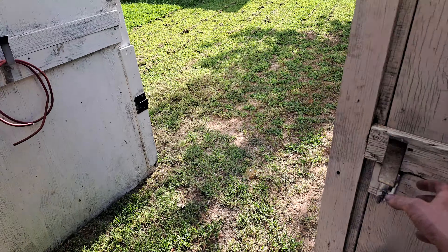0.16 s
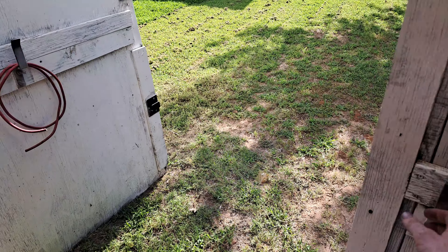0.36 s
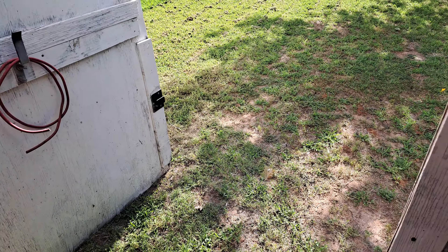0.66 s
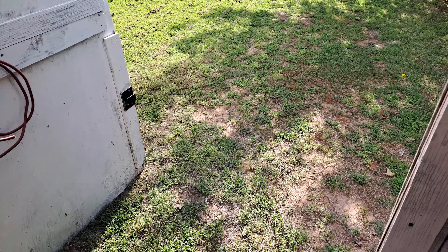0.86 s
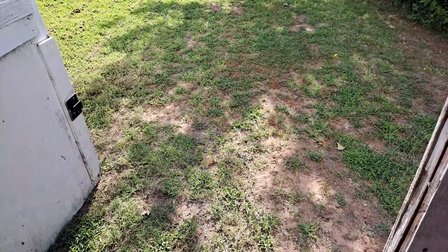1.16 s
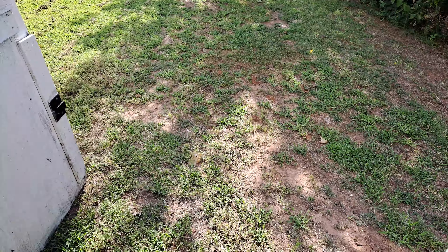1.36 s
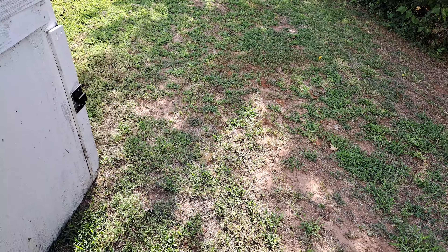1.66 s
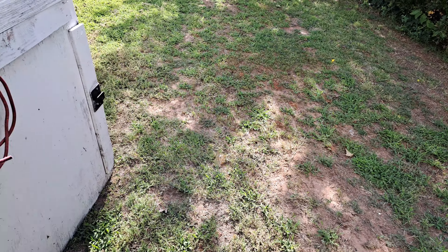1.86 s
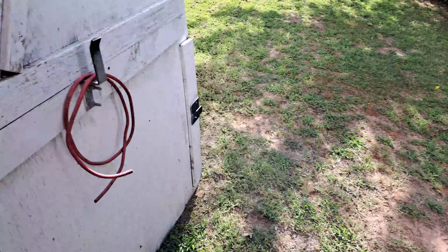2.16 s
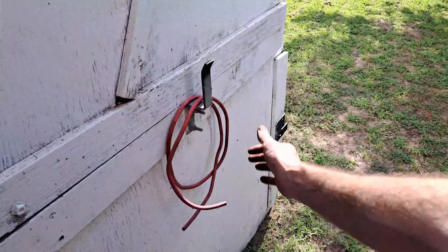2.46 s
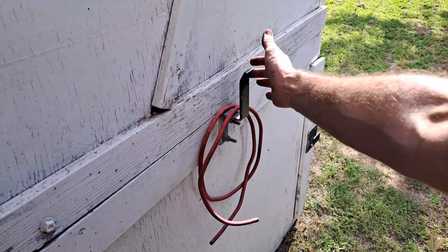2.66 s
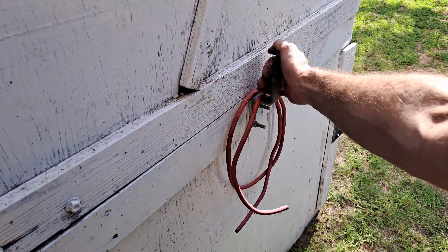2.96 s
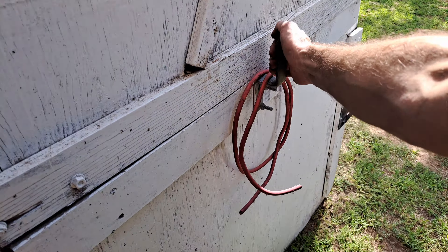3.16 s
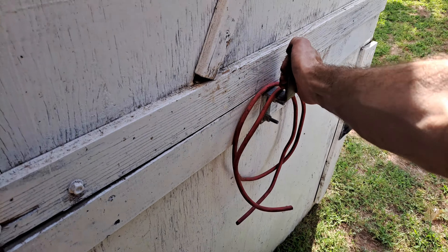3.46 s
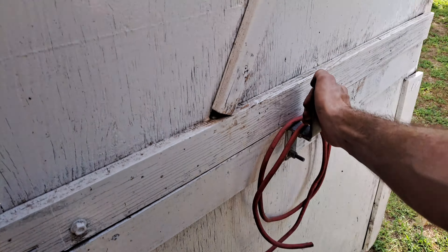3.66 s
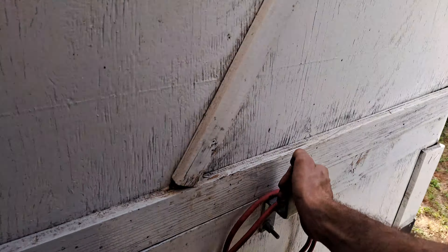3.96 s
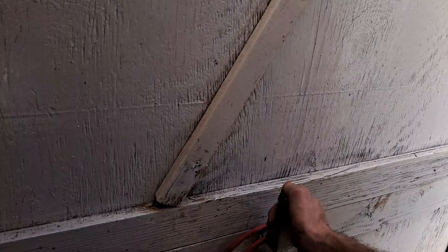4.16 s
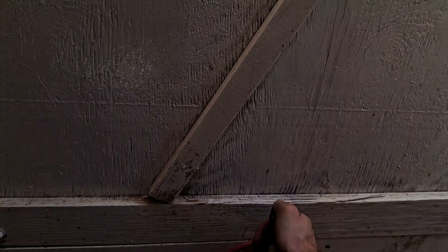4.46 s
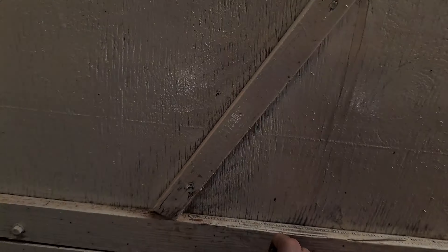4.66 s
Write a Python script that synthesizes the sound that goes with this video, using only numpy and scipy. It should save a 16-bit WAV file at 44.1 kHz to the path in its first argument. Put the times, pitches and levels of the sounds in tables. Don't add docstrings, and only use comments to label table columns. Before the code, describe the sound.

Close by, a plank door brushes over grass and grit with small clicks and light wooden knocks, then slams hard at about one and a half seconds, its loose steel latch rattling. A quiet yard with faint bird chips follows. The second door scrapes loudly over stones, judders and booms shut. Stereo microphone held at the doorway, short wooden shed reverberation.

```python
import sys
import numpy as np
from scipy import signal
from scipy.fft import rfft, irfft, next_fast_len
from scipy.io import wavfile
from scipy.ndimage import uniform_filter1d

SR = 44100
rng = np.random.default_rng(int(sys.argv[2]) if len(sys.argv) > 2 else 0)


def decibels_to_gain(level_db):
    exponent = np.asarray(level_db, float) / 20
    return 10 ** exponent


def inscribe(sig):
    pcm = np.round(np.clip(np.atleast_2d(sig).T, -1, 1) * 32767)
    wavfile.write(sys.argv[1], SR, pcm.astype(np.int16))


N = 211676
HALF_SECOND = np.arange(SR // 2) / SR


def unit(x):
    return x / np.sqrt(np.mean(x ** 2))


def colour(x, table):
    hz, db = np.transpose(table)
    size = next_fast_len(x.shape[-1])
    f = np.maximum(np.fft.rfftfreq(size, 1 / SR), 1)
    gain = decibels_to_gain(np.interp(np.log(f), np.log(hz), db))
    return irfft(rfft(x, size) * gain, size)[..., :x.shape[-1]]


def ring(x, hz, t60):
    pole = np.exp(2j * np.pi * hz / SR - np.log(1000) / (t60 * SR))
    return signal.lfilter([1], [1, -pole], x).imag


def band(x, hz, width_hz):
    return signal.lfilter(*signal.iirpeak(min(hz, .45 * SR), hz / width_hz, fs=SR), x)


def band_twice(x, hz, width_hz):
    return band(band(x, hz, width_hz), hz, width_hz)


def decay(t, t60):
    return np.exp(-np.log(1000) * t / t60)


def pan(db):
    return decibels_to_gain(np.array([db, -db]) / 2)


def walk(rate):
    k = int(SR / rate)
    held = np.repeat(rng.standard_normal(N // k + 1), k)
    return 1.3 * uniform_filter1d(uniform_filter1d(held, k), k)[:N]


# (frequency [Hz], side minus mid [dB])
PORT_SPREAD = [(60, -8), (110, -21), (200, -15.5), (380, -13.5), (700, -1), (1290, 1), (2380, -0.5),
               (4400, 1.5), (8120, 0.5), (15000, -0.5)]


def wide(envelope=1.):
    mid, side = envelope * rng.standard_normal((2, N))
    side = colour(side, PORT_SPREAD)
    return np.array([mid + side, mid - side])


def grains(rate, spread_db, tail_s):
    hit = rng.random(N) < rate / SR
    size = decibels_to_gain(spread_db * np.minimum(rng.exponential(size=N), 5.))
    power = signal.lfilter([1], [1, -np.exp(-1 / (tail_s * SR))], (hit * size) ** 2)
    return unit(np.sqrt(power + 1e-9))


def curve(table):
    s, *columns = np.transpose(table)
    return [np.interp(np.arange(N) / SR, s, c) for c in columns]


def add(out, s, sound):
    i = int(s * SR)
    out[:, i:i + sound.shape[1]] += sound[:, :N - i]


def draught(hz, width_hz, steady):
    wave = band(band(rng.standard_normal(N), hz, width_hz), hz, 2 * width_hz)
    wave = signal.hilbert(wave, next_fast_len(N))[:N]
    return unit(wave.real / (np.abs(wave) + 1e-9) ** steady)


# (time [s], level [dB])
DRAUGHT = [(0.0, -54), (0.09, -41), (0.22, -46), (0.59, -39.5), (0.67, -71), (0.86, -35), (1.1, -39),
           (1.16, -40.5), (1.45, -40.5), (1.54, -29), (1.72, -41.5), (2.45, -51), (2.85, -38.5),
           (2.93, -40), (3.15, -37), (3.4, -42), (4.03, -39.5), (4.75, -46)]
# (frequency [Hz], width [Hz], level [dB])
AIR_MODES = [(54.05, 5.7, -4.5), (120.7, 19, -10.5)]
# (time [s], level [dB], swell [s], t60 [s])
THUDS = [
    (1.527, -19.5, 0.014, 0.2),
    (3.139, -24, 0.0073, 0.065),
    (4.518, -15, 0.052, 0.35),
]


def shed_air():
    hum = sum(decibels_to_gain(db) * draught(hz, w, steady=0.32) for hz, w, db in AIR_MODES)
    out = np.tile(unit(hum) * decibels_to_gain(curve(DRAUGHT)[0] + 0.4), (2, 1))
    t = HALF_SECOND
    boom_hz = 54.9
    for s, db, swell, t60 in THUDS:
        shape = np.minimum(t / swell, 1) ** 2 * decay(np.maximum(t - swell, 0), t60)
        add(out, s, np.tile(decibels_to_gain(db) * shape * np.sin(2 * np.pi * boom_hz * t), (2, 1)))
    return out


# (frequency [Hz], level [dB per Hz])
YARD = [(15, -37), (25, -7), (60, 5), (97, -6.5), (321, -6), (410, -13.5), (496, -30), (553, -19.5),
        (901, -26), (1390, -33), (1510, -29), (1830, -30), (7910, -48.5), (10000, -53.5), (15200, -68),
        (16500, -76)]


def yard():
    return unit(colour(wide(decibels_to_gain(1.2 * walk(6.23))), YARD)) * decibels_to_gain(-42)


def strokes(table):
    s, swell, fade, db = np.transpose(table)[:4, :, None]
    late = np.arange(N) / SR - s
    part = np.where(late < 0, -late / swell, late / fade)
    drop_db, bend = 24.5, 1.175
    return decibels_to_gain(2 * (db - drop_db * part ** bend)) + 1e-12


# (hardest at [s], swell [s], fade [s], level [dB], stone pitch [Hz])
SCRAPES = [(.068, 0.36, 0.22, -48.5, 3200), (.4, 1, 1, -57, 2330), (.748, 0.056, 0.2, -49, 1290),
           (.98, 0.043, 0.16, -46.5, 2710), (1.224, 0.28, 0.15, -48, 3460), (1.46, 0.9, .3, -53.5, 3320),
           (1.58, 0.11, 0.14, -39, 2500), (2.3, 0.4, 3.8, -64, 1900), (2.57, 0.52, 0.062, -57.5, 2580),
           (3.14, 0.11, 0.55, -48.5, 2500), (3.286, 0.18, 0.11, -34.5, 5000),
           (3.349, 0.055, 0.012, -39.5, 2030), (3.55, 0.14, 0.3, -38.5, 3660),
           (3.671, 0.19, 0.09, -29, 2870), (3.931, 0.19, 0.78, -43.5, 2820),
           (4.12, 0.12, 0.16, -35.5, 3400), (4.184, 0.43, 0.044, -34.5, 2920), (4.4, 0.33, 0.28, -40, 2870),
           (4.579, 0.22, 0.17, -30, 2900), (4.8, 0.14, .2, -36, 2510)]
# (hardest at [s], swell [s], fade [s], level [dB])
SWEEPS = [(.05, 0.57, 0.29, -50.5), (.35, 1, 0.5, -51), (.66, 1, .05, -56.5), (.9, 0.027, .3, -62),
          (.98, 0.045, 1, -48.5), (1.22, 0.55, 0.067, -46), (1.52, 0.76, 0.22, -52.5),
          (2.17, 0.2, 0.9, -59.5), (2.57, 0.18, 0.071, -64), (3.29, 0.36, 0.26, -54.5),
          (3.54, 0.15, 0.47, -40.5), (4.06, 0.25, 0.41, -43), (4.4, 0.081, .4, -43.5),
          (4.58, 0.49, 0.16, -37.5), (4.8, 0.2, .2, -43.5)]
# (time [s], left minus right [dB])
DOOR_SIDE = [(0, 0), (3.0, 2), (3.4, -1.5), (4.0, 2.5), (4.8, 2)]
# (frequency [Hz], level [dB per Hz])
GRIT = [(410, -17), (700, -2), (832, -14.5), (1520, 0.5), (1660, -8.5), (1840, 0.5), (2170, -4),
        (2380, -3.5), (3360, -3), (6330, -11.5), (11000, -20), (14300, -10), (22000, -120)]
GRASS = [(4710, -4), (8000, -5.5), (9680, -12), (10900, -9), (12500, -3), (15200, -10.5), (16200, -16),
         (16500, -40)]
BOARD = [(47, -18), (80, 2.5), (190, -0.5), (226, -5), (299, -2.5), (434, -4), (646, -9), (751, -11.5),
         (815, -11), (1020, -15.5), (1300, -17), (1690, -28.5), (2860, -120)]
# (frequency [Hz], width [Hz], level [dB])
BRACE = [(1350, 110, -1.5), (1770, 56, -11), (2350, 150, 7.5), (3200, 48, -25), (4200, 270, 1),
         (5000, 68, -11)]


def drag():
    pulls = strokes(SCRAPES)
    pull_power = pulls.sum(axis=0)
    grit_db = 10 * np.log10(pull_power)
    grass_db = 10 * np.log10(strokes(SWEEPS).sum(axis=0))
    centre_hz = np.transpose(SCRAPES)[-1] @ pulls / pull_power
    catch = wide(grains(rate=1000.0, spread_db=1.5, tail_s=0.0036))
    brace = sum(decibels_to_gain(db + 3.0 * walk(43.0)) * band(catch, hz, 2.74 * w) for hz, w, db in BRACE)
    coloured, grit = colour(catch, GRIT), 0
    for hz in 700 * 2 ** (np.arange(14) / 3):
        octaves = np.log2(hz / centre_hz)
        lift_db = 4.0 * np.exp(-(octaves / 0.79) ** 2) + 1.9 * walk(29.97)
        lift_db = lift_db - 6 * np.maximum(octaves, 0)
        grit = grit + decibels_to_gain(lift_db) * band_twice(coloured, hz, 0.79 * hz)
    grit = unit(grit) + decibels_to_gain(-6.5) * unit(brace)
    grass = unit(colour(1.4 * catch + wide(decibels_to_gain(2.04 * walk(26.17))), GRASS))
    board = unit(colour(wide(grains(rate=510.0, spread_db=1.0, tail_s=0.0054)), BOARD))
    board_gain = np.hypot(decibels_to_gain(-18 + 0.4645 * grit_db), decibels_to_gain(-51.5))
    foot = decibels_to_gain(grit_db - 1.5) * grit + decibels_to_gain(grass_db + 1.54) * grass
    return pan(curve(DOOR_SIDE)[0]) * foot + board_gain * board


# (time [s], length [s], frequency [Hz],
# width [Hz], rms level [dB])
RUBS = [(.684, 0.024, 460, 50, -37), (0.746, .009, 1290, 300, -42.5), (0.767, 0.0089, 2180, 300, -56),
        (0.782, 0.0076, 1500, 400, -51), (1.47, .006, 4000, 1200, -44), (1.476, .006, 3800, 900, -31),
        (1.562, 0.014, 3700, 400, -36), (1.604, 0.013, 1900, 600, -39), (2.148, 0.0096, 1530, 500, -50),
        (2.659, 0.64, 780, 237, -55), (3.1325, .016, 800, 30, -27), (3.154, 0.0089, 815, 80, -41),
        (3.235, 0.015, 740, 120, -39.5), (3.283, 0.016, 730, 120, -45), (3.485, 0.0068, 2000, 900, -44),
        (3.511, 0.15, 3400, 700, -37.5), (3.735, .016, 2420, 150, -37), (3.867, 0.0066, 1660, 900, -49),
        (3.916, 0.11, 3100, 500, -45), (3.94, .008, 1960, 1200, -39), (3.997, 0.011, 2390, 1200, -43),
        (4.062, 0.013, 1530, 200, -31.5), (4.078, 0.063, 4080, 500, -38), (4.152, .055, 2530, 250, -46),
        (4.253, 0.013, 4060, 883, -44), (4.288, 0.018, 2400, 300, -35.5), (4.355, 0.013, 2590, 900, -42),
        (4.535, 0.061, 1810, 180, -37.5), (4.577, .04, 2870, 400, -41), (4.671, 0.048, 1240, 250, -44),
        (4.73, .008, 1240, 300, -35), (4.728, 0.0081, 3960, 500, -34.5), (4.76, 0.0068, 1230, 300, -30),
        (4.79, 0.013, 2060, 250, -33), (4.79, .008, 1200, 400, -34),
        (.03, .05, 2800, 900, -46), (.684, .006, 5500, 1500, -52), (.952, .008, 2330, 150, -46),
        (.969, .01, 2340, 150, -38), (1.482, .012, 800, 250, -20), (1.495, .05, 1020, 60, -28),
        (1.495, .06, 550, 60, -26), (1.49, .08, 231, 30, -27), (1.525, .006, 6300, 900, -26),
        (1.525, .006, 2400, 700, -25), (2.004, .008, 900, 500, -50), (3.14, .025, 200, 60, -35),
        (3.2, .07, 200, 70, -37), (3.265, .05, 6000, 1600, -39), (3.346, .009, 1800, 400, -34),
        (3.346, .008, 3200, 1500, -35), (3.517, .01, 2550, 200, -35), (3.543, .009, 4000, 400, -33),
        (3.575, .007, 3500, 900, -29), (3.626, .008, 3300, 600, -26), (3.651, .011, 3000, 1500, -25),
        (3.63, .07, 500, 200, -36), (3.67, .04, 3200, 250, -35), (4.02, .04, 3200, 1200, -40),
        (.742, .045, 2000, 1100, -43), (2.034, .008, 3500, 3000, -56), (2.365, .008, 6000, 6000, -56),
        (2.47, .04, 6000, 5000, -56), (2.566, .007, 9500, 6000, -55), (2.58, .007, 9000, 6000, -57),
        (2.682, .009, 7500, 1500, -56), (3.279, .009, 6300, 900, -33), (1.553, .075, 6370, 40, -41),
        (1.583, .03, 4680, 50, -43), (1.625, .05, 3430, 40, -42), (1.625, .035, 4620, 50, -44)]


def rubs():
    out = np.zeros((2, N))
    rise = .3
    unlike, steady, settle = .35, .7, 4096
    for s, length, hz, width_hz, db in RUBS:
        feed = rng.standard_normal((3, SR // 2 + settle))
        feed = feed[0] + unlike * feed[1:]
        wave = signal.hilbert(band(band(feed, hz, width_hz), hz, 2 * width_hz))[:, settle:]
        wave = unit(wave.real / (np.abs(wave) + 1e-9) ** steady)
        part = HALF_SECOND / length
        shape = np.sin(np.pi / 2 * np.clip(np.minimum(part / rise, (1 - part) / (1 - rise)), 0, 1))
        add(out, s, decibels_to_gain(db) * shape * wave)
    return out


# (time [s], peak [dB], bright edge [dB], left minus right [dB])
SNAPS = [(0.0813, -24, -5, 0), (0.278, -39.5, 8.5, -2), (0.325, -43, 14, 1), (0.483, -42, 17, -1),
         (.637, -47, 12, -2), (.6838, -49, 12, -4), (1.17, -30.5, -3, -4), (1.8057, -49.5, 2, -1),
         (2.21, -42, -1, -3), (2.5444, -40.5, -12, 7), (2.6846, -56, 4, 4), (3.042, -42, -5, 3)]
# (time [s], peak [dB], centre [Hz], t60 [s], bright edge [dB])
CLACKS = [
    (1.477, -11.5, 1900, 0.071, -13.5),
    (1.5252, -7.5, 2930, 0.027, -22),
    (1.552, -15.5, 2090, 0.13, -22),
    (1.6052, -28, 2270, 0.031, -38),
    (1.6347, -31, 2060, 0.033, -8),
    (2.4773, -41, 2020, 0.13, -29),
]
# (time [s], peak [dB], centre [Hz], left minus right [dB])
HINGE = [(0.7435, -44, 2130, 4), (0.761, -47, 2040, -2), (0.78, -48, 1790, -6), (0.9713, -42, 2230, 0),
         (1.009, -26.5, 2760, 4), (1.2402, -33, 2180, 2), (1.379, -33, 2060, 1), (1.43, -33.5, 5010, -8),
         (2.568, -44, 1540, 6), (2.585, -44, 1770, -8), (3.0334, -38, 2220, -8)]
STONES = [(3.1058, -33.5, 2190, 1.5), (3.1262, -27, 1900, 2), (3.167, -43, 2750, 4), (3.194, -28, 3680, -6),
          (3.2814, -18.5, 5600, 1), (3.3468, -17.5, 1750, 0), (3.4406, -28, 2880, 0), (3.517, -29, 2560, 8),
          (3.545, -28, 3200, 0), (3.5767, -24, 3380, 6), (3.628, -16.5, 3200, 7), (3.653, -22, 2840, -5),
          (3.659, -21, 2560, 13), (3.7, -24, 2350, 5), (3.744, -23, 2430, 10), (3.769, -28, 3780, 3),
          (4.0659, -23, 1540, -5), (4.2872, -26, 2320, -4), (4.3096, -23.5, 2350, 9), (4.675, -24, 1980, 5),
          (4.729, -19.5, 2050, 1), (4.7622, -13, 2050, 1), (4.7914, -14, 2060, 6)]


def ticks():
    out, t = np.zeros((2, N)), np.arange(SR // 8) / SR
    # (time [s], peak [dB], centre [Hz], left minus right [dB], t60 [s], bright edge [dB])
    clicks = [(s, db, 2000, pan_db, 0.026, edge_db) for s, db, edge_db, pan_db in SNAPS]
    clicks += [(s, db, hz, -1.5, t60, edge_db) for s, db, hz, t60, edge_db in CLACKS]
    clicks += [(*h, 0.024, -55) for h in HINGE]
    clicks += [(*stone, 0.016, -23.5) for stone in STONES]
    for s, db, hz, pan_db, t60, edge_db in sorted(clicks):
        shape = decay(t, 0.61 * t60) * np.minimum(t / 0.00099, 1)
        burst = rng.standard_normal((2, 2, len(t))) * shape
        body = band(band(burst[0], hz, 0.69 * hz), hz, hz)
        body = body + decibels_to_gain(0.75 * edge_db + 4.0) * band_twice(burst[0], 3600.0, 4200.0)
        edge = band_twice(burst[1], 14000.0, 9700.0)
        click = body / np.abs(body).max() + decibels_to_gain(edge_db - 1.5) * edge / np.abs(edge).max()
        add(out, s, decibels_to_gain(db) * pan(pan_db)[:, None] * click)
    return out


# (time [s], peak [dB], pitch [Hz], left minus right [dB])
KNOCKS = [(0.699, -35.5, 240, -6), (0.792, -28.5, 203, -2), (1.011, -41, 202, -9), (1.238, -32.5, 231, 0),
          (1.555, -23, 260, 5), (2.194, -42, 287, -7), (2.478, -31, 300, 7), (2.53, -30, 144, 1),
          (3.215, -28, 160, 1), (3.513, -34, 285, -2), (3.654, -25.5, 255, 2), (3.869, -27, 232, 1),
          (4.528, -24, 285, 1), (4.56, -20.5, 390, -1), (4.586, -20.5, 162, 4), (4.728, -30.5, 336, 3),
          (4.762, -27, 281, 0), (4.791, -26, 294, 3)]
RAPS = [(0.685, -28, 457, -4), (0.697, -34, 470, 8), (0.707, -31, 466, 0.5), (0.743, -46, 1350, -5),
        (0.973, -26, 450, -4), (1.529, -17, 490, 1), (2.004, -57, 505, -13), (3.138, -42, 820, -3),
        (3.281, -23.5, 738, -1), (3.308, -24.5, 443, 3), (3.973, -22.5, 510, -1), (4.065, -26.5, 473, -5),
        (4.287, -30.5, 950, 13), (4.298, -35, 690, -19), (4.762, -24.5, 580, 6), (4.792, -25, 513, -9)]
# (frequency [Hz], level [dB], t60 [s])
PANEL = [(129, -20, 0.17), (231, 1, 0.19), (360, -10, 0.014), (550, -26, 0.061), (594.5, -0.5, 0.052),
         (690, -16, 0.14), (799, -2.5, 0.16), (914, 0, 0.038), (997, -4.5, 0.072), (1305, 5, 0.078)]


def panel_modes(force):
    return sum(decibels_to_gain(db) * ring(force, hz, t60) for hz, db, t60 in PANEL)


def knocks():
    out, t = np.zeros((2, N)), HALF_SECOND
    # t60 [s], panel level [dB]
    blows = [(*k, 0.1, -9.5) for k in KNOCKS] + [(*r, 0.034, -17) for r in RAPS]
    for s, db, hz, pan_db, t60, panel_db in blows:
        push = rng.standard_normal((3, len(t))) * np.exp(-t / 0.004) * np.minimum(t / 0.0017, 1)
        push = push[0] + 0.1 * push[1:]
        soft = band(push, hz, 2.3 * hz)
        spot = ring(soft, hz, .6 * t60) + 10. * band(soft, hz, 1.5 * hz)
        panel = panel_modes(soft)
        blow = spot / np.abs(spot).max() + decibels_to_gain(panel_db) * panel / np.abs(panel).max()
        add(out, s, decibels_to_gain(db) * pan(pan_db)[:, None] * blow)
    return out


# (time [s], frequency [Hz], level [dB], t60
# [s], left minus right [dB])
LATCH = [(1.527, 7290, -33.5, 0.056, -8), (1.553, 3920, -34, 0.05, 8), (1.555, 6360, -53, 0.084, 15),
         (1.556, 3470, -26.5, 0.043, -1), (1.57, 7100, -48, 0.091, 0), (1.59, 4600, -52, 0.061, 4),
         (1.628, 3340, -44, 0.2, 1), (1.629, 4780, -46, 0.091, -6), (.953, 2350, -47, .02, 3),
         (.97, 2310, -35, 0.022, 3), (.744, 2350, -43, 0.035, 1)]


def latch():
    out, t = np.zeros((2, N)), HALF_SECOND
    for s, hz, db, t60, pan_db in LATCH:
        rattle = rng.standard_normal((2, len(t))) * np.exp(-t / 0.0036)
        bar = ring(rattle, hz, t60)
        add(out, s, decibels_to_gain(db) * pan(pan_db)[:, None] * bar / np.abs(bar).max(axis=1, keepdims=True))
    return out


# (time [s], level [dB], contact time [s], left minus right [dB])
SLAM = [
    (1.4700, -17, 0.0029, 1),
    (1.4737, -15.5, 0.0015, -1),
    (1.478, -3.5, 0.00075, -1.5),
    (1.4814, -14.5, 0.0011, 0),
    (1.4846, -15, 0.0012, -3),
    (1.498, -30, 0.00044, -2),
    (1.506, -22, 0.001, -8),
]


def slam():
    out, t = np.zeros((2, N)), HALF_SECOND
    lag_s = np.array([[0.00028], [0]])
    for s, db, contact, pan_db in SLAM:
        force = np.sin(np.pi * np.clip((t - lag_s) / contact, 0, 1))
        panel = panel_modes(force) / force[1].sum()
        crack = band(force, 0.68 / contact, 0.53 / contact)
        loose = band(band(rng.standard_normal((2, len(t))), 650.0, 710.0), 710.0, 1390.0)
        loose = loose * np.exp(-t / 0.063) * np.minimum(t / 0.0032, 1)
        blow = crack / np.abs(crack).max() + decibels_to_gain(-13.5) * panel + decibels_to_gain(-5) * loose
        add(out, s, -decibels_to_gain(db) * pan(pan_db)[:, None] * blow)
    return out


# (start [s], end [s], pitch [Hz], level [dB])
BIRDS = [
    (2.09, 2.102, 7100, -64),
    (2.087, 2.182, 2410, -60),
    (2.28, 2.31, 2360, -56),
    (2.763, 2.818, 8000, -69),
    (2.83, 2.875, 8000, -72),
]


def birds():
    out = np.zeros((2, N))
    for start, end, hz, db in BIRDS:
        n = int((end - start) * SR)
        waver = 1 + 0.004 * walk(100.0)[:n]
        whistle = np.hanning(n) ** 0.33 * np.sin(2 * np.pi * hz * np.cumsum(waver) / SR)
        add(out, start, np.tile(decibels_to_gain(db) * whistle, (2, 1)))
    return out


def plank_walls():
    t = HALF_SECOND
    walls = rng.standard_normal((2, len(t))) * decay(t, 0.22) * np.minimum(t / 0.0079, 1)
    walls = colour(walls, [(100, 5.0), (1500, -4.5), (8000, -2.5), (16000, 1.0)])
    walls += colour(walls[::-1] - walls, [(150, -4), (500, -16), (2000, -37)])
    return walls / np.sqrt(np.sum(walls ** 2, axis=1, keepdims=True))


def scene():
    doors = drag() + slam() + knocks() + ticks() + latch()
    walls = plank_walls()
    around = yard() + shed_air() + birds()
    doors = doors + rubs()
    return doors + decibels_to_gain(-6.5) * signal.fftconvolve(doors, walls, axes=1)[:, :N] + around


def roll_off(x):
    return signal.sosfilt(signal.butter(12, 16620, fs=SR, output="sos"), x)


# (frequency [Hz], left minus right [dB])
PORTS = [(50, 1.5), (500, -3), (2000, -1.5), (8000, -1.5), (13000, -6.5)]


def record(dry):
    left = colour(dry[0], [(hz, db / 2) for hz, db in PORTS])
    right = colour(dry[1], [(hz, -db / 2) for hz, db in PORTS])
    x = np.array([left, right])
    x = signal.sosfilt(signal.butter(3, 38., "high", fs=SR, output="sos"), x)
    x = signal.sosfilt(signal.ellip(6, .2, 45, 15850, fs=SR, output="sos"), x)
    return roll_off(np.clip(x, -1, 1))


dry = scene()
out = record(dry)
inscribe(out)
```